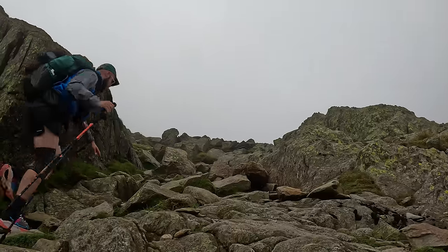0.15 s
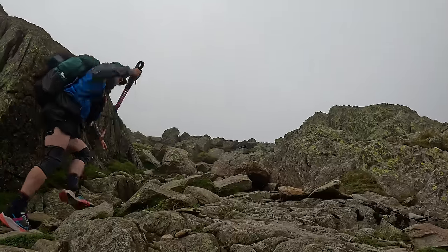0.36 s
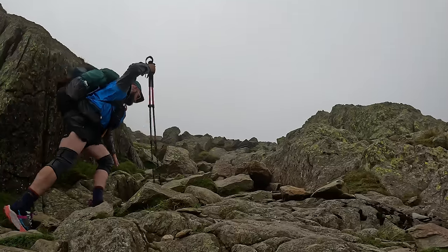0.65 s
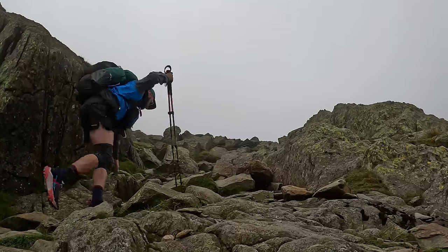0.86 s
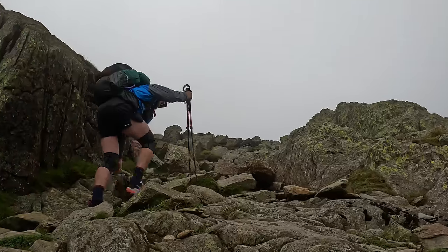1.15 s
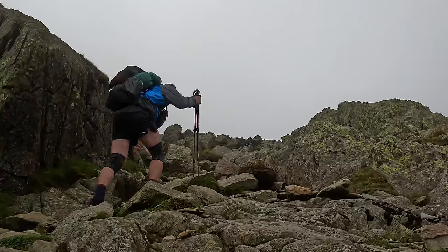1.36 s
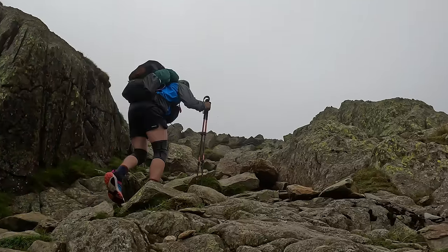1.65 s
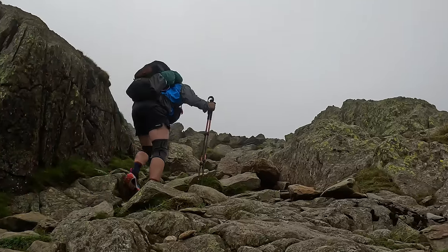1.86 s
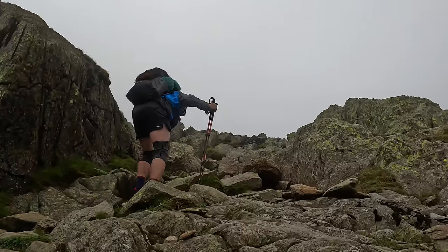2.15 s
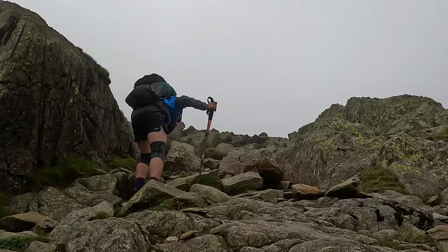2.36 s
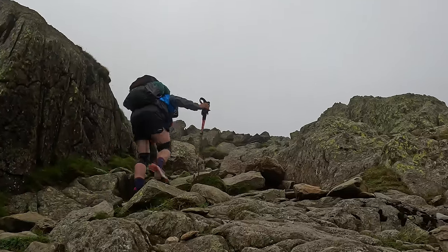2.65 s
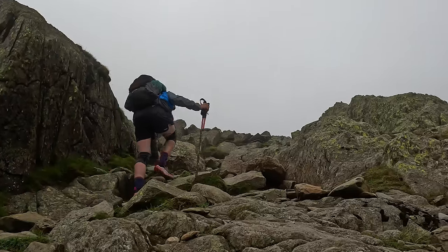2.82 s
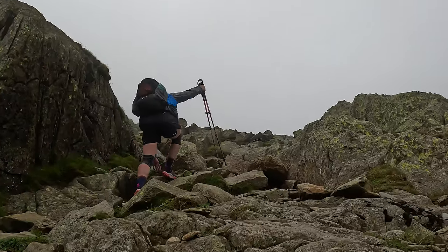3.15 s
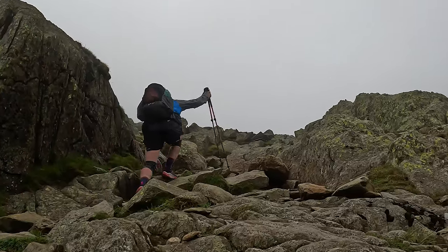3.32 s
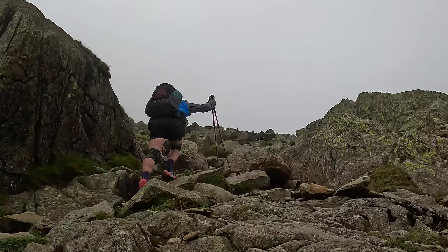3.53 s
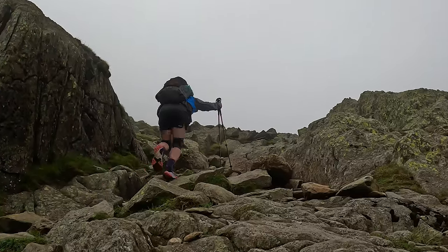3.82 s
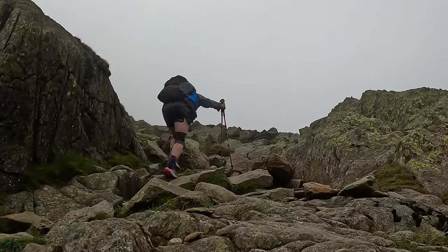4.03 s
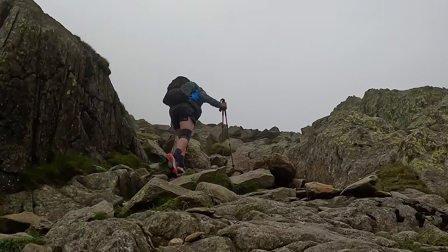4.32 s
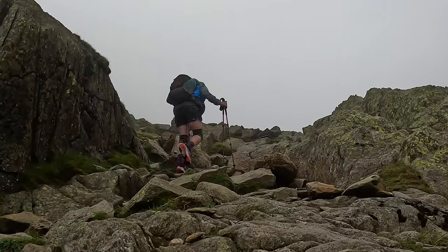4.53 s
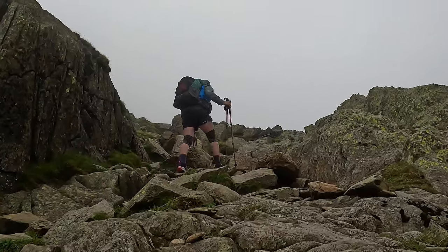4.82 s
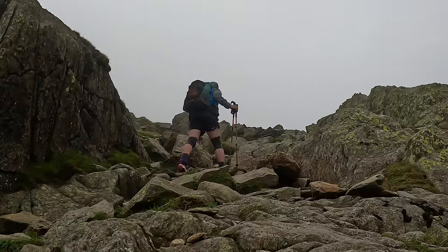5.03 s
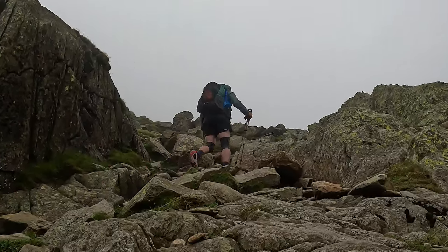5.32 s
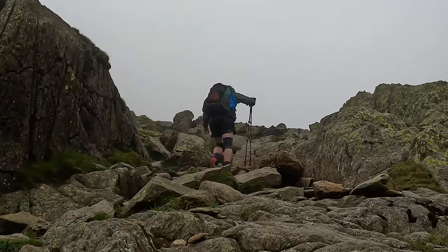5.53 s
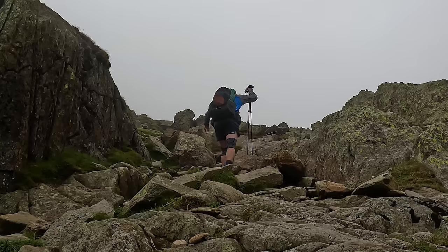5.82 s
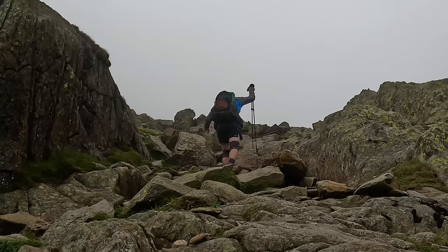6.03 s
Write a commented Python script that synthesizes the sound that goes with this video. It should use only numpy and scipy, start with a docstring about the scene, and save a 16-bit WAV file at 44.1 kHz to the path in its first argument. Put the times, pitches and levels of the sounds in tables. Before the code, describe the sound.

A walker with poles climbs over boulders, metal tips clicking sharply on stone, soles thudding and crunching grit, pack and clothing rustling close by.

```python
"""A walker climbs over boulders, drifting from the left to the middle of a small camera microphone.
From the start cloth and pack rustle as shaped noise and lumpy wind noise rumbles low; pole tips and grit
click close by as damped rings and chatter, soles thud as sagging sines, and each step grinds and crunches.
A rock face close by answers clicks and thuds with a short noise tail; late on, rubber drags over rock.
The microphone has a hollow lower middle, a narrow notch, faint hiss and an upper band limit."""
import sys
import numpy as np
from scipy import signal
from scipy.fft import rfft, irfft, next_fast_len
from scipy.io import wavfile
from scipy.ndimage import map_coordinates

SR = 44100
rng = np.random.default_rng(int(sys.argv[2]) if len(sys.argv) > 2 else 0)


def int16_out(signal):
    """Quantize to a 16-bit WAV file."""
    q = np.round(np.clip(np.atleast_2d(signal).T, -1, 1) * 32767)
    wavfile.write(sys.argv[1], SR, q.astype(np.int16))


N = 272272

# weight on a boot: full_weight_s, held_s, grind_db, rumble_db, crunch_db
BOOT_LOADS = [(.1, 0.14, -53.5, -62.5, -52.5), (.58, 0.096, -42, -70, -50),
              (0.749, 0.0088, -39.5, -74.5, -41), (1.09, 0.1, -50, -59, -47),
              (1.362, 0.075, -35.5, -54.5, -41.5), (1.79, 0.1, -64, -49, -62),
              (2.161, 0.25, -55, -74, -58.5), (2.4, 0.14, -47, -60, -59.5), (2.9, 0.07, -52.5, -65, -55),
              (3.348, 0.13, -50, -57, -53.5), (3.6, 0.092, -53.5, -65, -58), (4.19, 0.088, -60, -75, -59),
              (4.33, 0.029, -44.5, -73, -52), (4.9, 0.048, -72, -91, -59.5),
              (5.05, 0.23, -44.5, -68, -53.5), (5.26, 0.13, -56.5, -55, -62), (5.651, 0.021, -56, -64, -64),
              (5.88, 0.21, -51, -54, -55), (6.1, 0.077, -70, -67.5, -56.5)]
# colour of rubber slapping stone: frequency_hz, relative_db
SLAP_COLOUR = [(200, -54.5), (450, 3), (800, 5), (1500, -14.5), (3000, -57)]
GRIT_HZ = 1523  # centre pitch of grit
SOLE_HZ, SOLE_OCTAVES = 561.3, 0.18  # pitch of rubber on stone, and how far it strays


def amp(db):
    """Decibels to linear gain."""
    return 10 ** (np.asarray(db) / 20)


def unit(x):
    """Scale a signal to rms 1."""
    return x / np.sqrt(np.mean(x ** 2) + 1e-20)


def along(points, hz):
    """Read (frequency_hz, value) points on a log frequency axis."""
    point_hz, value = np.transpose(points)
    return np.interp(np.log(hz + 1), np.log(point_hz + 1), value)


def curves(rows):
    """One value per sample for each column after the time."""
    time_s, *columns = np.transpose(rows)
    return [np.interp(np.arange(N) / SR, time_s, column) for column in columns]


def wobble(rate):
    """A smooth random curve with rate knots a second."""
    knots = rng.standard_normal(int(N * rate / SR) + 4)
    return map_coordinates(knots, [np.arange(N) * rate / SR])


def filtered(x, response):
    """Multiply the spectrum of x by a response of frequency."""
    n = x.shape[-1]
    padded = next_fast_len(n + 8192)
    return irfft(rfft(x, padded) * response(np.fft.rfftfreq(padded, 1 / SR)), padded)[..., :n]


def noise(spectrum, size=N):
    """Noise of rms 1 with the given colour."""
    return unit(filtered(rng.standard_normal(size), lambda hz: amp(along(spectrum, hz))))


def wide(spectrum, side_db):
    """Stereo noise: a shared part and a weaker part of opposite sign on the two sides."""
    return noise(spectrum) + amp(side_db) * np.outer([1, -1], noise(spectrum))


def around(hz, octaves, size):
    """Noise of rms 1 in a bell around a frequency."""
    def bell(f):
        return 1 / (1 + (np.log2((f + 1) / hz) / octaves) ** 2) ** 2
    return unit(filtered(rng.standard_normal(size), bell))


def envelope(t, rise, t60):
    """Soft rise, exponential fall, top 1; rise and t60 in seconds."""
    shape = (1 - np.exp(-t / rise)) ** 2 * amp(-60 * t / t60)
    return shape / shape.max()


def add(track, s, sound):
    """Mix a sound in at time s."""
    track[round(s * SR):][:len(sound)] += sound


def load(rows, column):
    """Gain under the rows' weight: it arrives, is held and leaves; powers add."""
    arrive_s, leave_t60_s = 0.038, 0.27
    t, power = np.arange(N) / SR, np.zeros(N)
    for row in rows:
        since = t - row[0]
        arriving = np.clip(since / arrive_s + 1, 0, 1)
        leaving_db = -60 * np.maximum(since - row[1], 0) / leave_t60_s
        power += (arriving * amp(row[column] + leaving_db)) ** 2
    return np.sqrt(power)


def pebbles(hz, size):
    """Grit breaks in scattered grains, each a short ring of its own pitch and size; rms 1 in all."""
    grains_per_s, cycles_to_die = 400, 9
    spread_octaves, spread_db = 0.7, 4.5
    count, t = int(grains_per_s * size / SR), np.arange(SR // 100) / SR
    start = rng.integers(size, size=(count, 1))
    pitch = rng.standard_normal((count, 1))
    loud = rng.standard_normal((count, 1))
    cycles = hz * 2 ** (spread_octaves * pitch) * t
    rings = amp(spread_db * loud - 60 * cycles / cycles_to_die) * np.sin(2 * np.pi * cycles)
    places = start + np.arange(len(t))
    return unit(np.bincount(places.ravel(), rings.ravel(), size)[:size])


def rustle():
    """Cloth swishes evenly; straps scuff in lumpier grains; grit crunches under each step."""
    # how busily cloth and pack move: time_s, swish_db
    motion = [(0, -48.5), (.14, -48), (.4, -52.5), (.54, -45.5), (.72, -49), (1.13, -51.5), (1.3, -54),
              (1.47, -49), (1.72, -59), (1.83, -50.5), (1.93, -61), (2.12, -64), (2.33, -53), (2.72, -56),
              (2.9, -49), (3.07, -56), (3.27, -59.5), (3.42, -49), (3.55, -52), (4.0, -52), (4.14, -58),
              (4.33, -53), (4.85, -66.5), (4.93, -61.5), (5.2, -55), (5.55, -61.5), (5.8, -58),
              (6.17, -60.5)]
    # colour of cloth: frequency_hz, relative_db
    swish_colour = [(1500, -20), (3500, -3), (5600, 4.5), (7500, 1.5), (9700, -5), (13000, -22.5),
                    (16000, -56)]
    # colour of straps and grit scuffing: frequency_hz, relative_db
    scuff_colour = [(500, -33), (1000, 0), (1600, 2.5), (2800, -1), (4500, -13.5), (8000, -26.5)]
    strap_db, strap_growth = -57.5, 1.09  # mean level; swings wider than the swish
    grain_share = 0.65  # the rest of the crunch is scuffing noise

    swish_db, = curves(motion)
    flutter_db = 1.1 * wobble(50)
    swish = unit(amp(flutter_db + 0.79 * wobble(240)) * wide(swish_colour, side_db=-43.5))
    scuff = unit(amp(flutter_db + 1.8 * wobble(120)) * wide(scuff_colour, side_db=-9.5))
    crackle = pebbles(GRIT_HZ, size=N)
    crunch = unit(grain_share * crackle + (1 - grain_share) * wide(scuff_colour, side_db=-5.0))
    scuff_db = strap_db + strap_growth * (swish_db - swish_db.mean())
    return amp(swish_db) * swish + amp(scuff_db) * scuff + load(BOOT_LOADS, column=4) * crunch


def ground():
    """Wind and shifting weight rumble in lumps; loaded soles grind on the rock in coarse grains."""
    # wind and the murmur of the ground: time_s, rumble_db, murmur_db
    wind = [(0, -44, -51), (.3, -69, -60.5), (5.1, -71.5, -60), (5.4, -60.5, -59), (5.8, -52.5, -63),
            (6.17, -66, -49)]
    # colour of the rumble: frequency_hz, relative_db
    rumble_colour = [(35, -34.5), (55, -0.5), (80, -0.5), (120, -4), (170, -7.5), (300, -60)]
    # colour of grinding and murmur: frequency_hz, relative_db
    grind_colour = [(100, -17.5), (170, -1), (280, -2), (400, -12.5), (550, -8), (850, -13.5), (1300, -60)]

    wind_db, murmur_db = curves(wind)
    rumble = unit(amp(3 * wobble(8.8)) * wide(rumble_colour, side_db=-7))
    grind_lumps_db = 0.73 * wobble(9.6) + 3.3 * wobble(70)
    grind = unit(amp(grind_lumps_db) * wide(grind_colour, side_db=-6.5))
    rumble_gain = np.hypot(amp(wind_db), load(BOOT_LOADS, column=3))
    grind_gain = np.hypot(amp(murmur_db), load(BOOT_LOADS, column=2))
    return rumble_gain * rumble + grind_gain * grind


def contact(t, hz, bright_db, rise, t60, ring):
    """Stone chatters around its pitch and cracks above, over a given ringing; a weaker tail follows."""
    # colour of stone knocking: frequency_hz, relative_db
    knock_colour = [(500, -2.5), (1000, -3), (1700, 7), (3200, 4), (5000, -26.5)]
    # colour of the crack above it: frequency_hz, relative_db
    crack_colour = [(2000, -26), (4200, -3), (6000, -5), (8000, -8.5), (10000, -16), (13000, -45)]

    knock_gain = 0.57 * amp(0.46 * bright_db)  # brighter contacts chatter more broadly
    chatter = 0.38 * around(hz, 0.58, size=len(t)) + knock_gain * noise(knock_colour, size=len(t))
    spike = (ring + chatter) * envelope(t, rise, 0.5 * t60)
    tail = 0.48 * chatter * envelope(t, rise, 1.3 * t60)
    crack_shape = envelope(t, rise / 2, 0.11 * t60) + 0.8 * envelope(t, rise, t60)
    return spike + tail + amp(bright_db) * noise(crack_colour, size=len(t)) * crack_shape


def clicks():
    """Hard tips make fast contacts that ring stone and shaft; grit under rubber swells and fades more slowly."""
    # tips and pebbles, levels before trim, decay scaled by layer:
    # start_s, level_db, ring_hz, brightness_db, decay_s
    tip_hits = [(0.0532, -32, 1810, 14.5, 0.029), (0.075, -29.5, 2420, 8.5, 0.026),
                (.166, -21, 1710, 10.5, 0.025), (0.1698, -16.5, 1674, -14, 0.1),
                (0.1827, -8.5, 1700, -6.5, 0.046), (.196, -21, 1600, -15, .04),
                (0.212, -17.5, 1570, -22, 0.03), (0.2915, -34.5, 2770, -2, 0.073),
                (0.516, -34, 1650, -2, 0.1), (0.6113, -9, 2040, -11.5, 0.035),
                (0.6118, -8.5, 1493, -11, 0.066), (0.617, -11.5, 1080, -21, 0.051),
                (0.7557, -19, 2600, -9.5, 0.096), (0.758, -19, 1600, -37, 0.066),
                (.787, -22.5, 1270, -18, 0.021), (0.9334, -37.5, 3130, 9, 0.059),
                (1.072, -8, 1344, -5.5, 0.082), (1.202, -34, 2440, -12, 0.045),
                (1.259, -36, 1880, -14, 0.027), (1.297, -34, 1480, -8, 0.033),
                (1.35, -30, 1700, -25, 0.087), (1.3712, -27, 2780, -15, 0.11),
                (1.3891, -23, 1900, -11.5, 0.078), (1.4261, -30.5, 2130, -3, 0.17),
                (1.519, -40.5, 1410, 4.5, 0.31), (1.564, -40, 1720, -1.5, 0.25),
                (2.2202, -34, 1140, -14, 0.12), (3.225, -36.5, 2000, -11, 0.03),
                (3.3506, -10.5, 1640, -5, 0.052), (3.423, -34.5, 2300, -10, 0.062),
                (3.56, -18, 1470, -55, 0.025), (3.566, -29, 887, -30, 0.16),
                (3.6108, -27.5, 1710, -9, 0.056), (3.629, -20.5, 1610, -15, 0.023),
                (3.671, -30, 2880, -16, 0.062), (4.4227, -29.5, 2320, -16, 0.021),
                (4.443, -31, 2700, -5.5, 0.035), (4.4945, -27, 2500, 1, 0.016),
                (4.6408, -50.5, 1276, 14, 0.065), (5.0243, -22, 1560, -11, 0.08),
                (5.0265, -19, 2960, -10.5, 0.07), (5.038, -29.5, 2920, -9, 0.031),
                (5.113, -33, 1630, -14, .03), (5.308, -34, 1085, -58, 0.097),
                (5.378, -29.5, 1510, -54, 0.04), (5.8587, -18.5, 1456, -14.5, 0.046),
                (5.897, -26, 1664, -39, 0.063), (6.058, -27, 1600, -42, 0.073),
                (6.153, -29.5, 1297, -22, 0.17)]
    # strikes that set the pole shaft ringing: start_s, level_db, t60_s
    shaft_hits = [(0.0752, -16, 0.014), (1.07, -11.5, 0.018)]
    # grit giving way under a sole, levels before trim: start_s, level_db, brightness_db
    grit_breaks = [(0.572, -20.5, -20), (0.748, -27, -24), (1.115, -35, 0), (1.149, -20.5, -8),
                   (1.1761, -41.5, 13.5), (1.336, -27, -21), (1.474, -24, -22), (2.172, -30, -14.5),
                   (2.419, -27.5, -12.5), (2.475, -21.5, -27), (2.497, -32, -7), (2.998, -22.5, -31.5),
                   (3.168, -34.5, -9.5), (3.45, -34, -1), (4.1847, -25.5, -30), (4.2017, -27.5, -5),
                   (4.322, -33.5, 0.5), (4.3329, -30, -4.5), (5.117, -23, -13), (5.177, -34, -13),
                   (5.257, -37, 0.5), (5.6701, -35.5, -18), (5.913, -30, -7.5)]
    snap_hz, snap_t60_s, snap_db = 5450, 0.0038, 6.5  # first instant of a hard tip on stone
    shaft_hz = 3234  # a short mode of the pole shaft
    grit_hz_per_db = 18  # brighter grit also chatters higher

    out, t = np.zeros(N + SR), np.arange(SR // 6) / SR
    for s, db, hz, bright_db, t60 in tip_hits:
        ring = 0.71 * np.sin(2 * np.pi * hz * t)
        hit = contact(t, hz, bright_db, rise=0.00021, t60=t60, ring=ring)
        add(out, s + 0.0001, amp(db - 7.0) * hit)
        snap = np.sin(2 * np.pi * snap_hz * t) * envelope(t, 0.0001, snap_t60_s)
        add(out, s, amp(db - 7 + bright_db + snap_db) * snap)
    for s, db, t60 in shaft_hits:
        add(out, s, amp(db) * np.sin(2 * np.pi * shaft_hz * t) * envelope(t, 0.000098, t60))
    for s, db, bright_db in grit_breaks:
        hz = GRIT_HZ + grit_hz_per_db * bright_db
        ring = 0.59 * pebbles(hz, size=len(t))
        crumble = contact(t, hz, bright_db, rise=0.0014, t60=0.15, ring=ring)
        add(out, s - 0.001, amp(db - 12.5) * crumble)
    return out[:N]


def rock(x):
    """The rock face answers with a noise tail in which each frequency dies at its own speed."""
    # how long the rock face answers: frequency_hz, t60_s
    rock_decay = [(150, 0.31), (1500, 0.073), (8000, 0.063)]
    hz, t, z = signal.stft(rng.standard_normal((2, SR // 3)), SR, nperseg=256)
    fading = amp(-60 * t / along(rock_decay, hz)[:, None])
    tail = signal.istft(z * fading, SR, nperseg=256)[1]
    tail = tail / np.linalg.norm(tail, axis=1, keepdims=True)
    return signal.fftconvolve(x[None], tail, axes=1)[:, :N]


def thuds():
    """The sole pushes the boulder: a damped thump sags in pitch as weight settles; rubber slaps above."""
    # soles landing and rolling, level before trim, nominal pitch, slap relative to thump:
    # start_s, level_db, thump_hz, slap_db
    landings = [(0.141, -37, 164, -30), (0.575, -29, 143, 3), (0.614, -29, 300, 0.5),
                (0.764, -23.5, 350, -11.5), (0.795, -32.5, 230, -7), (1.074, -28.5, 247, -5),
                (1.093, -26, 133, -25), (1.337, -29, 228, 0), (1.378, -18.5, 157.4, -10.5),
                (1.473, -25, 206, -9), (2.152, -31.5, 198, -9), (2.176, -30, 220, -12),
                (2.194, -30.5, 210, -8), (2.219, -28.5, 215, -27), (2.38, -27.5, 232, -12),
                (2.416, -39, 230, -22), (2.471, -33.5, 214, -6), (2.997, -29, 189, 0),
                (3.158, -31.5, 250, -9), (3.174, -36.5, 270, -3), (3.189, -42.5, 303, 2),
                (3.313, -37.5, 220, -29), (3.345, -22.5, 205.5, -8), (3.365, -25.5, 161, -13),
                (3.39, -33, 206, -30), (3.592, -32, 224, -11), (3.622, -33, 182, -25),
                (4.205, -30.5, 243.5, -10.5), (4.236, -38, 88, -21.5), (4.333, -29.5, 301, -5),
                (4.367, -31.5, 234, 2.5), (5.052, -36.5, 184, -12), (5.114, -37, 232, 9),
                (5.258, -38.5, 252, 1), (5.898, -35.5, 95, 4.5), (5.918, -31.5, 163, -6),
                (5.952, -41.5, 170, 2)]
    thump_cycles = 17  # nominal swings until a thump dies away

    out, t = np.zeros(N + SR), np.arange(SR // 4) / SR
    for s, db, hz, slap_db in landings:
        sagging_hz = hz * (0.748 + 0.41 * np.exp(-t / 0.021))
        phase = 2 * np.pi * np.cumsum(sagging_hz) / SR
        thump = 0.9 * np.sin(phase) + 0.3 * around(hz, 0.8, size=len(t))
        thump = thump * envelope(t, 0.0039, thump_cycles / hz)
        knock = np.sin(2 * np.pi * SOLE_HZ * 2 ** rng.normal(0, SOLE_OCTAVES) * t)
        slap = 0.68 * noise(SLAP_COLOUR, size=len(t)) + 0.78 * knock
        slap = slap * envelope(t, 0.0012, 0.076)
        add(out, s - 0.002, amp(db - 0.5) * (thump + amp(slap_db) * slap))
    return out[:N]


def slides():
    """A dragged sole sticks and slips in lumps: the colour of its slap around a wandering resonance."""
    # rubber dragged over rock: full_weight_s, held_s, level_db
    drags = [(5.112, 0.042, -38), (5.18, 0.017, -59)]
    groan_hz = SOLE_HZ * 2 ** (SOLE_OCTAVES * wobble(35))
    groan = np.sin(2 * np.pi * np.cumsum(groan_hz) / SR)
    rubbing = 1.8 * groan + 0.43 * wide(SLAP_COLOUR, side_db=-13.5)
    return load(drags, column=2) * unit(amp(3.2 * wobble(90)) * rubbing)


def scene():
    """Clicks and rustle drift from the left to the middle; thuds stay centred."""
    # walker's side: time_s, left_minus_right_db
    place = [(0, 2), (.8, 2), (1.1, 1), (3, 1), (6.2, 0)]
    treble_hz, treble_pans = 6000, 2.7  # the camera body shades treble more: side dB times 2.7

    side_db, = curves(place)
    pan = amp([side_db / 2, -side_db / 2])
    tips, boots = clicks(), thuds()
    near = tips + rustle()
    treble = filtered(near, lambda hz: hz ** 2 / (hz ** 2 + treble_hz ** 2))
    panned = pan * (near - treble) + pan ** treble_pans * treble
    echoes = amp(-10.0) * rock(tips + amp(-11.5) * boots)
    return panned + boots + echoes + ground() + slides()


def record(dry):
    """Each capsule's own faint hiss, microphone colour with its notch, then the band limit."""
    # microphone response: frequency_hz, gain_db
    mic_response = [(25, -40), (55, -16.5), (80, 1), (900, -3.5), (1050, 2.5), (3200, 0), (4200, -1),
                    (13200, -4), (15500, -20.5)]
    # colour of the hiss: frequency_hz, relative_db
    hiss_colour = [(6000, -28), (10000, 8), (13000, -1), (15500, -29.5)]
    notch_hz, notch_width_hz, top_hz = 3660, 330, 15600

    def response(hz):
        off_centre, width = notch_hz ** 2 - hz ** 2, 1j * hz * notch_width_hz
        notch = (off_centre + 0.08 * width) / (off_centre + width)
        return amp(along(mic_response, hz)) * notch * (hz < top_hz)

    hiss = amp(-76) * np.array([noise(hiss_colour), noise(hiss_colour)])
    return filtered(dry + hiss, response)


dry = scene()
out = record(dry)
int16_out(out)
```